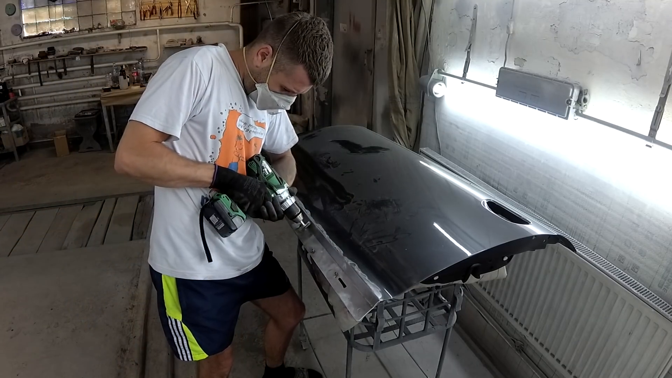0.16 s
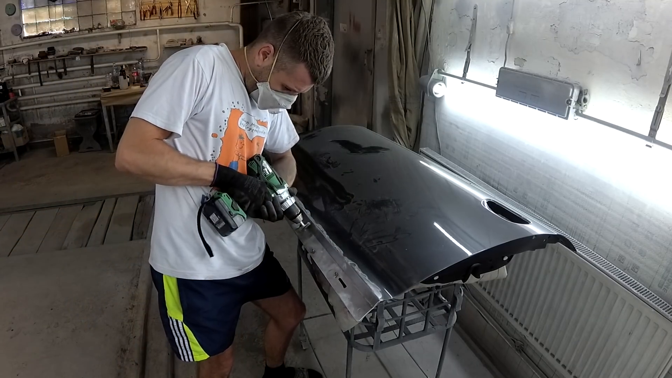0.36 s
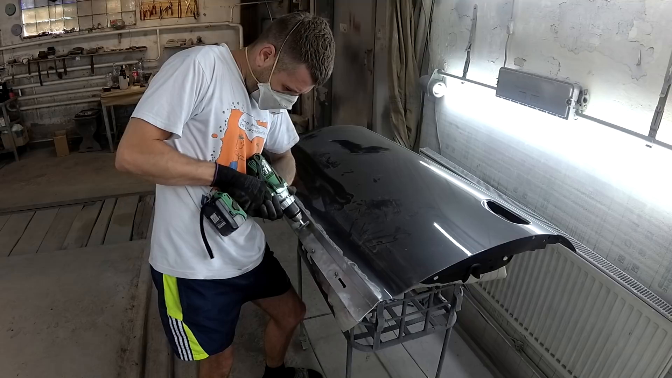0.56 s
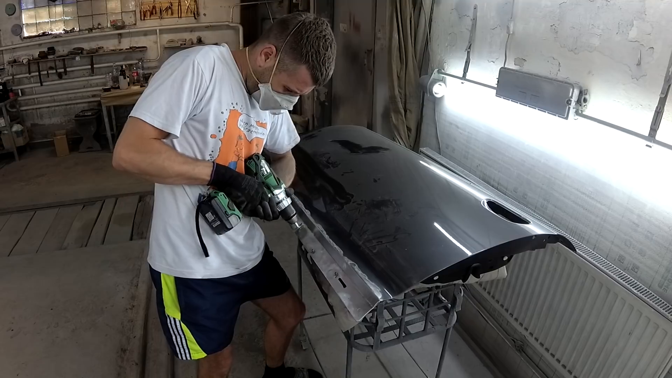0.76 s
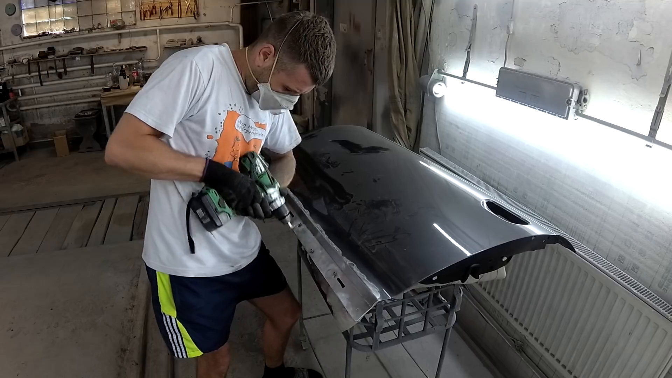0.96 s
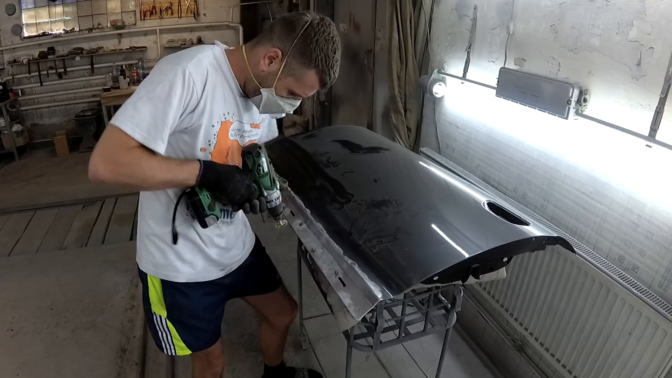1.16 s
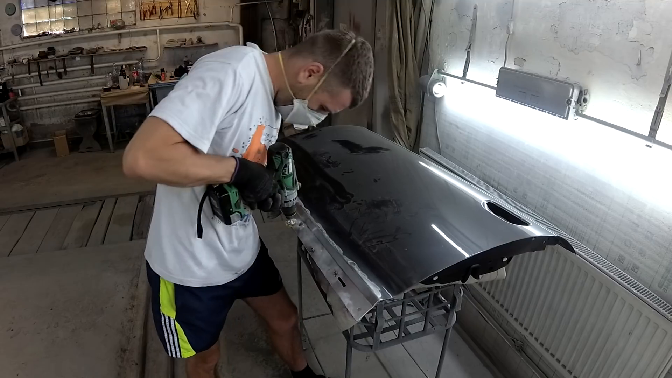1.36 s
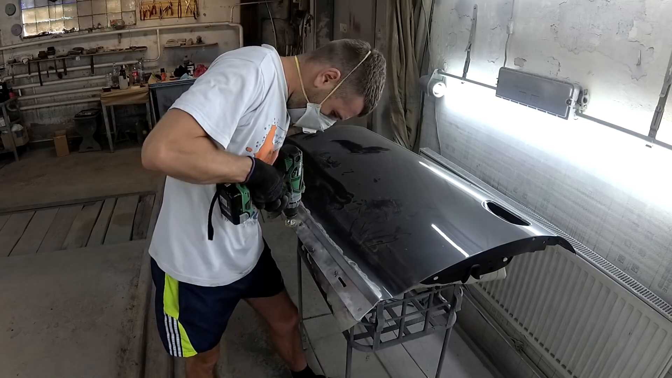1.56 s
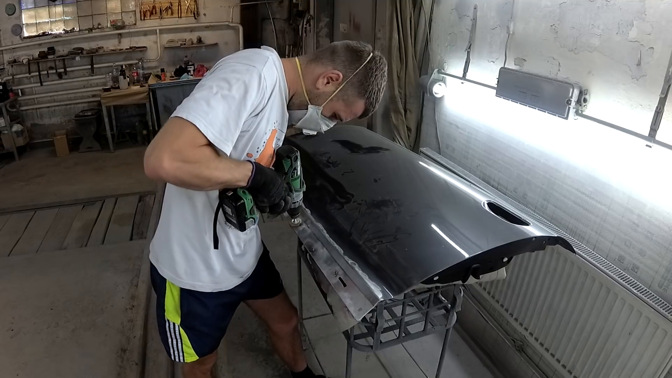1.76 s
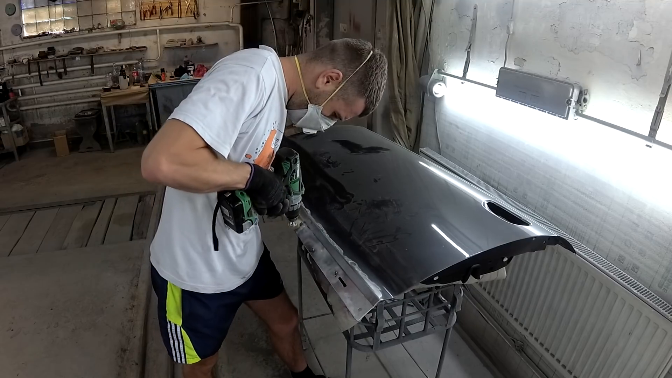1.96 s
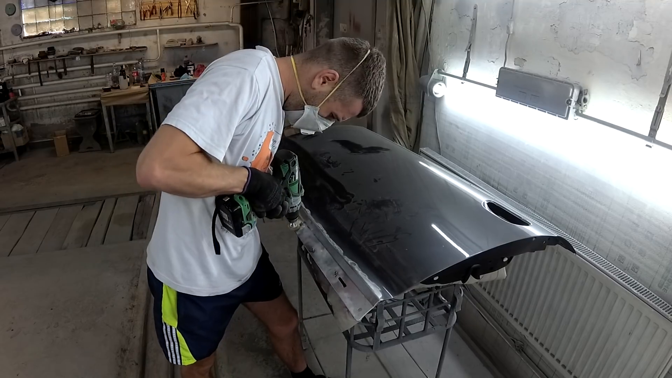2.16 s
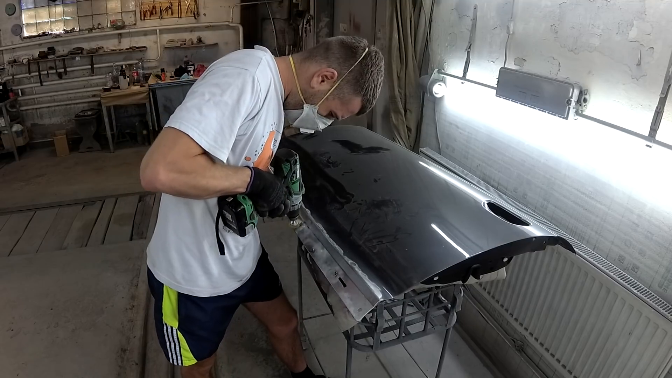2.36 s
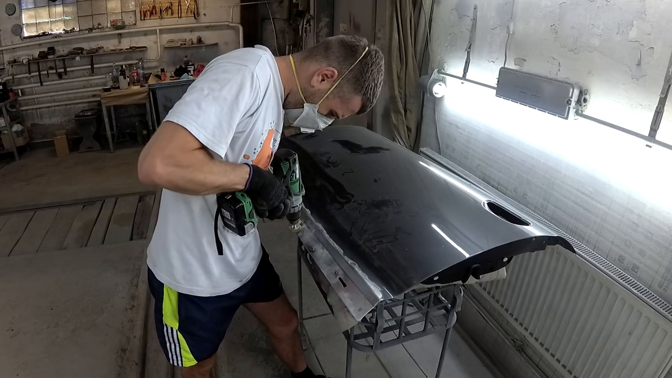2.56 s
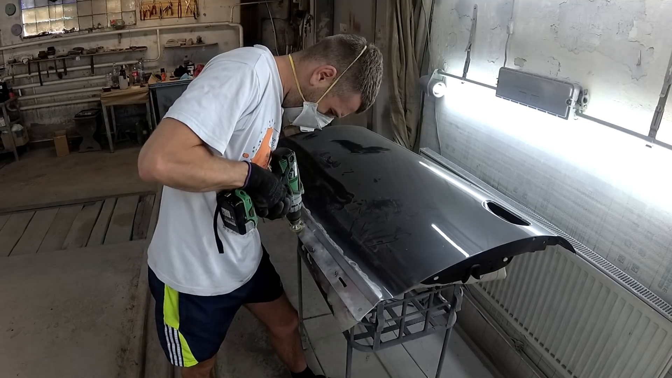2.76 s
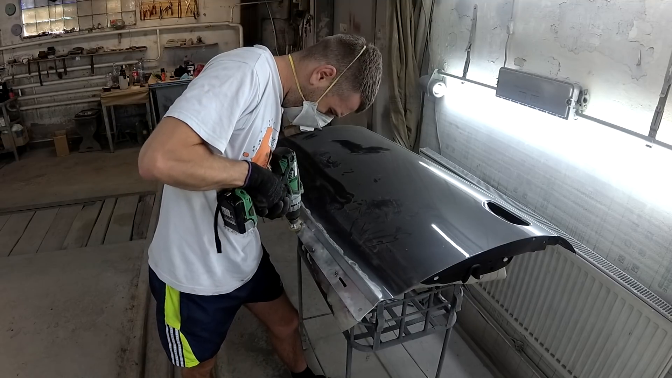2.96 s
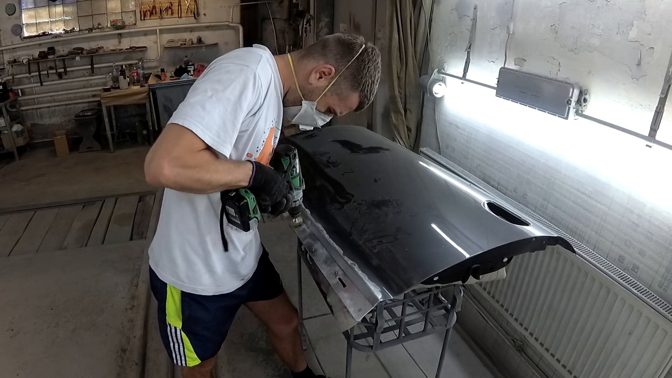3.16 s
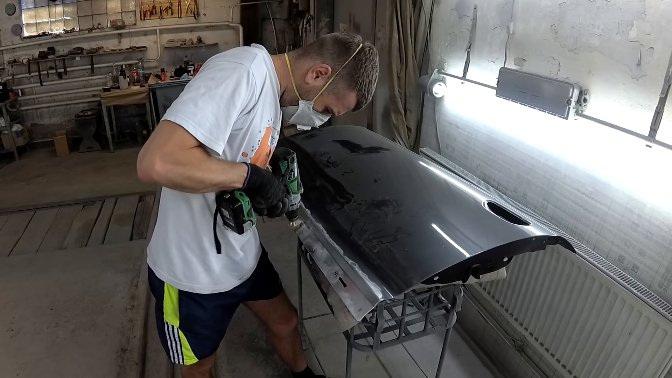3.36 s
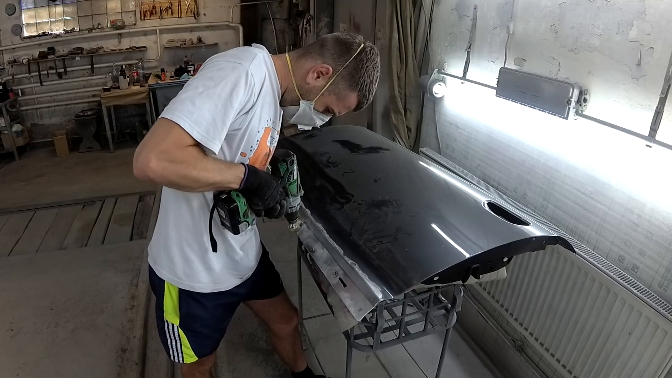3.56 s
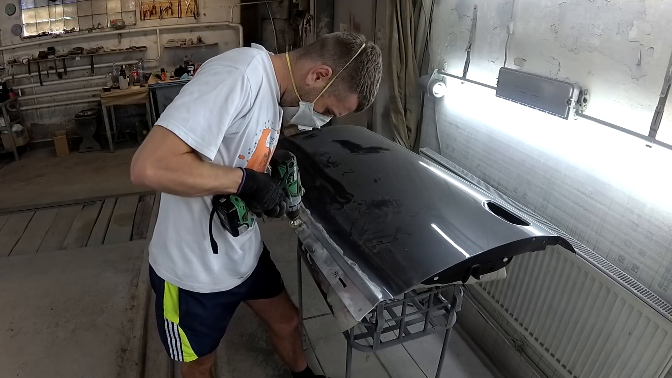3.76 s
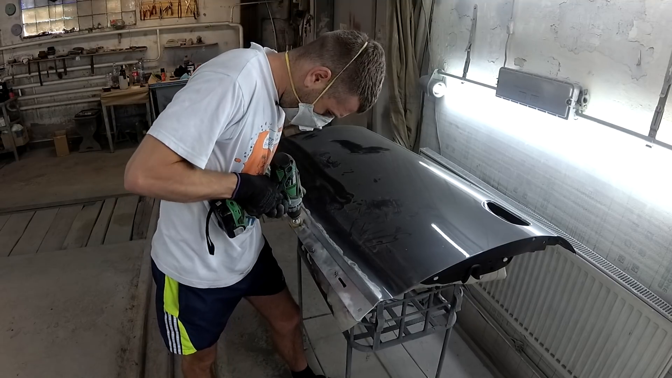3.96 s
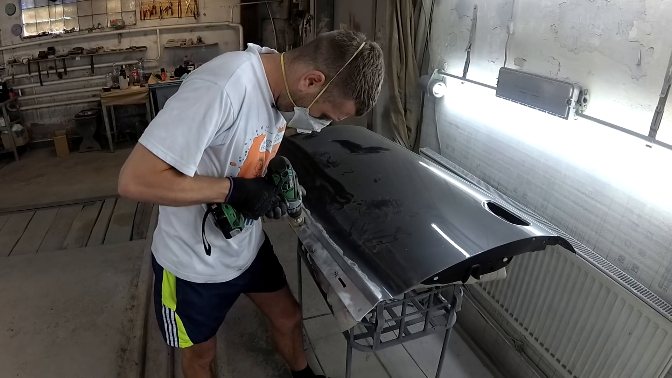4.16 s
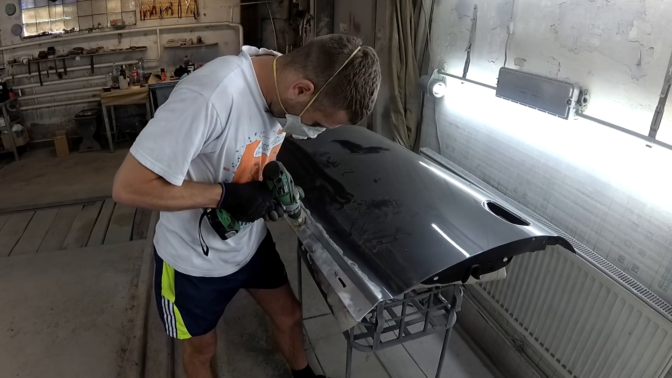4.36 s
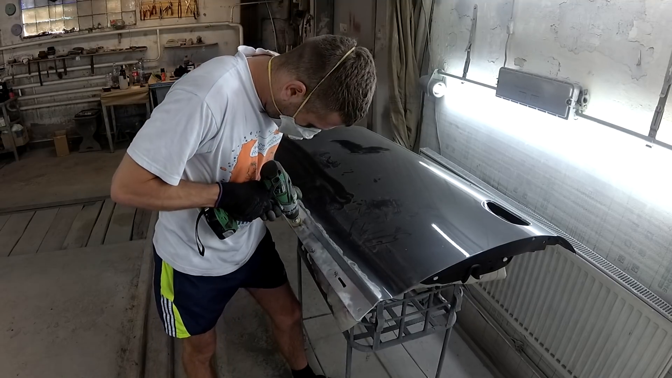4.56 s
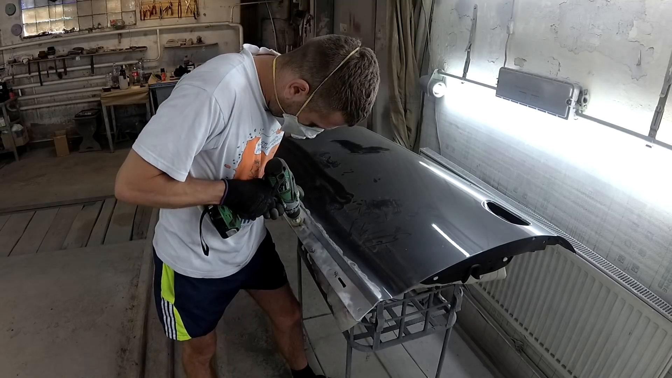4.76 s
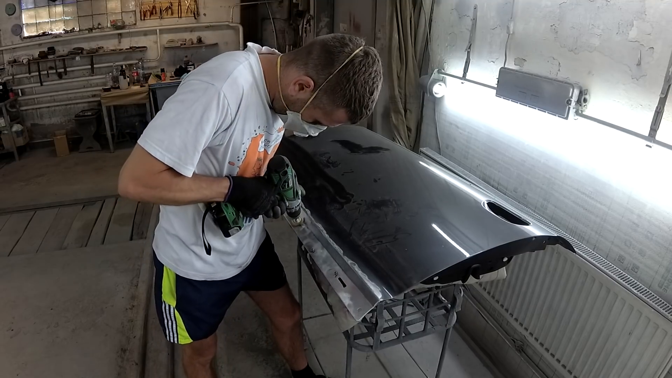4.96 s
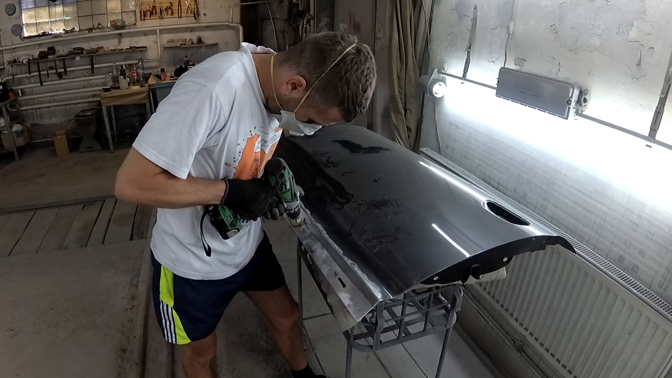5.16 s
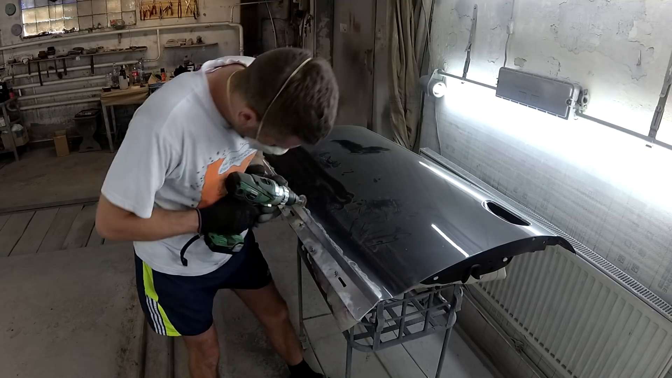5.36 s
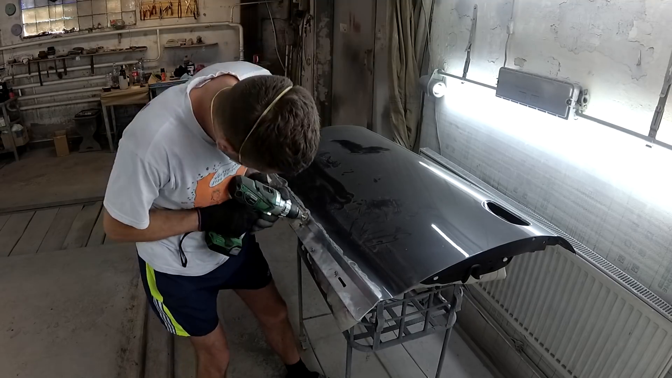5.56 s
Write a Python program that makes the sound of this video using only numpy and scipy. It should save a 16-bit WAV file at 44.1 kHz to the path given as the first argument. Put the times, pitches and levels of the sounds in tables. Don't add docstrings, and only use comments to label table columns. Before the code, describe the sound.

A small camera with stereo microphones sits close to a cordless drill, whose bright sound leans left, in a quietly humming workshop. From 0 s the motor is already whirring, with a fuzzy whine above 4 kHz, while a wire brush scrubs a metal panel. The off-centre brush bites roughly 26 times a second, giving a fast fluttering rasp and hollow, clattery sheet ringing; sharper catches occur near 0.34, 0.6 and 0.94 s. At 1.05 s the trigger clicks off and the tool brakes almost instantly. Soft ventilation, faint glove rustles, light metal ticks around 1.6 s and a barely audible far engine fill the gap. At 1.75 s the drill restarts, brushing in short irregular strokes with snags and rattles, notably near 2.85-3.24 s. Longer, heavier scrubbing runs from 3.75 to 4.55 s, then shorter strokes until about 5.3 s. The trigger clicks, a small rustle follows near 5.47 s, and only shop hum remains.

```python
import sys
import numpy as np
from scipy import signal
from scipy.fft import rfft, irfft
from scipy.io import wavfile
from scipy.ndimage import uniform_filter1d

SR = 44100
rng = np.random.default_rng(int(sys.argv[2]) if len(sys.argv) > 2 else 0)


def linear_from_db(decibels):
    return 10 ** (np.asarray(decibels, float) / 20)


def waveform_to_disk(signal):
    frames = np.transpose(np.atleast_2d(signal))
    scaled = np.clip(frames, -1, 1) * 32767
    samples = np.round(scaled).astype(np.int16)
    wavfile.write(sys.argv[1], SR, samples)


N = 248283
T = np.arange(N) / SR
HZ = np.fft.rfftfreq(N, 1 / SR)

# (frequency [Hz], density [dB per Hz])
SHOP_AIR = [(30, -21), (60, -14), (110, -18.5), (250, -8), (400, 6.5), (1500, 0.5), (2300, 2), (2800, -4.5),
            (5500, -10.5), (16000, -19)]
# (frequency [Hz], level [dB rms])
HUM = [(349.9, -73), (608.3, -77), (1055, -82), (1405, -85.5), (1755, -83.5), (2105, -81.5), (3693, -92),
       (5615, -84), (7020, -103)]
# (frequency [Hz], likeness [0..1])
SHOP_SAME = [(60, 1), (600, 0.8), (1600, 0.93), (3500, .05)]
# (frequency [Hz], level [dB])
SHOP_LEFT_DB = [(2400, -1), (4400, 4)]
# (from [s], to [s])
RUNS = [
    (0, 1.05),
    (1.75, 5.34),
]
# (time [s], rate [Hz])
MESH = [(0, 4400), (.5, 4380), (.95, 4330), (2.5, 4300), (2.9, 4320), (3.1, 4250), (3.6, 4220), (4.3, 4190),
        (4.5, 4130), (4.7, 4210), (5.63, 4215)]
# (frequency [Hz], density [dB per Hz])
WHIR = [(100, -43), (300, -6), (1000, 0.5), (2500, 1), (4300, -2.5), (6400, -7), (8500, -1), (11000, -5.5),
        (16000, -23)]
# (frequency [Hz], width [Hz], level [dB])
CASE = [(3980, 30, -43)]
# (multiple of turn rate, level re whir [dB])
ORDERS_DB = [(4, -40), (5, -38.5), (6, -35), (7, -33)]
# (first bite [s], let off [s], start pressure [dB], end pressure [dB], bite over contact [dB])
STROKES = [(0, .33, -51.5, -51, -15), (0.362, 0.698, -51.5, -53.5, 2.5), (0.715, 0.899, -55, -54, 9),
           (1.786, 1.784, -73, -69, -13), (1.869, 1.97, -56, -50.5, 3), (1.961, 2.076, -43, -57, -10),
           (2.198, 2.305, -58, -57, 8), (2.308, 2.514, -52.5, -48.5, 2.5), (2.692, 2.987, -57, -56.5, 12),
           (3.026, 3.14, -52.5, -52, 9), (3.16, 3.241, -48.5, -45, -1.5), (3.367, 3.38, -58, -54.5, 11.5),
           (3.427, 3.594, -53.5, -50, 5.5), (3.626, 3.7, -54, -56, 5.5), (3.743, 4.093, -50, -49, 1.5),
           (4.134, 4.537, -46.5, -45, 2), (4.673, 4.757, -55.5, -49.5, 4.5), (4.821, 4.893, -53, -52, -2),
           (4.942, 5.29, -53, -53, 2.5)]
# (time [s], rasp [dB], push into panel re rasp [dB], length [ms])
CATCHES = [(.07, -40.5, -2, 8.6), (.338, -39.5, 1, 6.5), (.483, -44, 0, 6.2), (.6, -41, -5.5, 7),
           (.937, -38.5, -2, 6.6), (1.547, -67, -10, 5.6), (1.575, -69, -4, 11), (1.607, -61.5, 7, 7.9),
           (1.785, -46, -16, 9.4), (1.846, -42.5, -7, 4.6), (1.941, -41, -4, 3.8), (2.104, -46, 2, 8.5),
           (2.256, -45, 0, 5.2), (2.494, -49, -1, 2.8), (2.578, -58, 7, 5), (2.661, -46, -7, 6.7),
           (2.691, -46.5, 6.5, 4.4), (2.842, -39, 4, 3.3), (2.994, -36.5, -6, 6), (3.141, -43, 4.5, 7.3),
           (3.237, -37, 2, 7.1), (3.972, -35.5, -18, 6), (4.403, -39, -1, 9), (4.53, -43, 5, 6),
           (4.601, -38, -0.5, 6), (4.757, -46, 2, 9), (4.916, -38, 1.5, 7), (4.978, -53, 8, 3.3),
           (5.115, -50, 4.5, 5), (5.269, -45, 1, 6.9)]
# (frequency [Hz], density [dB per Hz])
RASP = [(2000, -31.5), (5000, -30), (8000, -9), (11400, -4.5), (12100, 2), (14100, 3.5), (15800, 1.5),
        (17000, -13)]
# (frequency [Hz], width [Hz], level [dB])
PANEL = [(355, 12, -12), (409, 20, -3), (500, 17, -6), (624, 12, -14), (656, 36, -12), (872, 12, -6),
         (904, 17, -6), (990, 15, -12), (1108, 42, -1.5), (1281, 13, -11), (1424, 30, -5), (1641, 16, -12),
         (1690, 25, -9), (1792, 19, -12), (1959, 39, -12), (2234, 28, -13), (2293, 18, -15),
         (2460, 16, -17)]
# (frequency [Hz], level [dB])
SHEET = [(150, -58.5), (280, -20.5), (340, -31.5), (390, -6), (500, -7.5), (570, -14), (850, -15.5),
         (950, -31), (1150, -10), (1300, -19.5), (1440, -10.5), (1550, -18.5), (2500, -23), (3200, -36.5)]
# (time [s], give of the sheet [dB], stiffness favouring higher modes [dB])
SPOT = [(0, -2.5, 0.5), (.35, -3, -2), (.65, -4, -15), (.8, 3, 3.5), (1.05, 0, -0.5), (1.6, 2, -1),
        (1.78, 3, 2.5), (1.9, -4, 8), (2.22, 0.5, 4.5), (2.55, -6.5, 7.5), (2.7, 0.5, 4), (3.1, -1.5, 6),
        (3.3, -6.5, 5), (3.7, -4, 1), (3.95, -2, 6.5), (4.2, -3.5, -1), (4.5, -2, 4), (5., -6, -1.5)]
# (from [s], to [s], start level [dB], end level [dB], rattle re level [dB])
SHUDDERS = [
    (0.949, 1.007, -43.5, -38.5, -0.5),
    (1.56, 1.606, -74, -77, -1),
    (1.725, 1.77, -63, -56.5, -5),
    (5.3, 5.322, -67.5, -59, 11),
]
# (frequency [Hz], likeness [0..1])
TOOL_SAME = [(60, .6), (130, .9), (400, .99), (1200, .95), (2000, .8), (3000, .47), (3900, .15), (7000, .1),
             (11000, .2), (12200, .35), (13600, .2), (15200, .55)]
# (frequency [Hz], level [dB])
TOOL_LEFT_DB = [(60, 13), (110, 1), (200, -6.5), (380, -0.5), (700, -2), (1290, -1), (2380, -1), (4400, 9),
                (8120, 8), (15000, 15)]
# (frequency [Hz], lead of left port [rad])
LAG = [(0, 0), (1300, -.5), (2000, -1.), (3300, -.7), (4500, 1.3), (6500, .2), (10000, .2), (11500, 1.2),
       (13000, 0), (15000, -2.7)]
# (time [s], level [dB])
JOLTS = [(.79, -80), (0.871, -78), (1.97, -77), (2.692, -78), (2.847, -70), (2.994, -78), (3.237, -74),
         (4.46, -75), (4.52, -76)]
# (time [s], level [dB], fade [dB/s])
HANDLING = [
    (1.048, -46, 298),
    (1.28, -73.5, 250),
    (1.36, -69.5, 150),
    (1.62, -75, 150),
    (5.315, -51, 250),
    (5.469, -62.5, 152),
]
# (frequency [Hz], density [dB per Hz])
RUSTLE = [(1500, -19), (3000, 2), (8000, -1.5), (12000, -4.5), (16000, -12)]

SHOP_DB, MIC_HISS_DB = -73.5, -80
TEETH = 165
IDLE_DB = (-54, -61)
STRAIN_DB, STRAIN_SLOPE = -54, 0.57
SPIN_UP_DB_PER_S, BRAKE_DB_PER_S = 452, 396
PRESS_DB_PER_S, LIFT_DB_PER_S, SETTLE_DB_PER_S = 255, 103, 208
BITE_MS, BITE_SPREAD_DB, BITE_DUTY, SLIP_MS = 6.6, 1.1, 0.2, 2.2
PUSH_DB, PUSH_SPREAD_DB = -5, 2.5
UPPER_SHARE, UPPER_DB = 0.78, -6
CHATTER_DB, CHATTER_MS = 2, 18
LEAD_S = 7 / SR
EDGE_HZ = 15800


def evened(x):
    return x / np.sqrt(np.mean(x ** 2) + 1e-20)


def slow_noise(shape, span):
    noise = uniform_filter1d(rng.standard_normal(shape), span)
    return evened(uniform_filter1d(noise, span))


def read(points, hz):
    f, value = np.transpose(points)
    return np.interp(np.log(hz + 1), np.log(f + 1), value)


def curve(rows, column):
    rows = np.asarray(rows)
    return np.interp(T, rows[:, 0], rows[:, column])


def held(start, end, start_db, end_db, rise, fall):
    slide = np.interp(T, [start, end], [start_db, end_db])
    return slide - rise * np.maximum(start - T, 0) - fall * np.maximum(T - end, 0)


def colour(x, points):
    return irfft(rfft(x) * linear_from_db(read(points, HZ)), N)


def band_rms(x, lo_hz, hi_hz):
    power = abs(rfft(x)) ** 2
    inside = (HZ > lo_hz) & (HZ < hi_hz)
    return np.sqrt(power[..., inside].sum(-1).mean() * 2) / N


def ports(pair, same, left_db):
    a, b = rfft(pair)
    c = np.clip(read(same, HZ), -1, 1)
    tilt = linear_from_db(read(left_db, HZ) / 2)
    delay = np.exp(-1j * (read(LAG, HZ) + 2 * np.pi * HZ * LEAD_S))
    right = (c * a + np.sqrt(1 - c ** 2) * b) * delay
    gain = 2 / np.sqrt(tilt ** 2 + tilt ** -2 + 2 * abs(c))
    return irfft(np.array([a * tilt, right / tilt]) * gain, N)


def shop():
    air = colour(rng.standard_normal((2, N)), SHOP_AIR)
    air *= linear_from_db(SHOP_DB) / band_rms(air, 700, 16000)
    waver = evened(uniform_filter1d(rng.standard_normal((len(HUM), N // 500 + 2)), 5))
    hum = np.zeros(N)
    for (hz, db), w in zip(HUM, waver):
        level_db = db + 0.5 + 0.78 * np.interp(T, np.arange(len(w)) * 500 / SR, w)
        hum += linear_from_db(level_db) * np.sin(2 * np.pi * (hz * T + rng.random()))
    return ports(air, SHOP_SAME, SHOP_LEFT_DB) + hum


def chuck_turns():
    return np.cumsum(curve(MESH, column=1)) / TEETH / SR


def spinning():
    return np.array([held(on, off, 0, 0, SPIN_UP_DB_PER_S, BRAKE_DB_PER_S) for on, off in RUNS])


def pressure():
    contact = np.array([held(*row[:4], PRESS_DB_PER_S, LIFT_DB_PER_S) for row in STROKES])
    contact = contact + spinning().max(0)
    extra = 10 * np.log10(1 + BITE_DUTY * linear_from_db(2 * np.array(STROKES)[:, 4:]))
    return contact.max(0), (contact + extra).max(0)


def load(effort_db):
    idle = spinning() + np.array(IDLE_DB)[:, None]
    strain = STRAIN_DB + STRAIN_SLOPE * (effort_db + 52)
    return 10 * np.log10(sum(linear_from_db(2 * db) for db in [*idle, strain]))


def drill(effort_db):
    z = rfft(rng.standard_normal((2, N)))
    case = sum(linear_from_db(db) * np.sqrt(7000 / width) / (1 + 2j * (HZ - hz) / width) ** 2
               for hz, width, db in CASE)
    hiss = irfft(z * (linear_from_db(read(WHIR, HZ)) + case), N)
    hiss /= band_rms(hiss, 3000, 10500)
    turns = chuck_turns()
    fuzz = slow_noise((2, 2, N), 450)
    whine = ((2.6 + fuzz[0] + 1j * fuzz[1]) * np.exp(2j * np.pi * TEETH * turns)).real
    whine *= linear_from_db(np.interp(T, [.9, 1.9, 2.5, 3.5], [-16.5, -27, -24, -18.5]))
    shake = sum(linear_from_db(db + fuzz[0]) * np.sin(2 * np.pi * (k * turns + rng.random())) for k, db in ORDERS_DB)
    running = sum((T > on) & (T < off) for on, off in RUNS)
    gate = uniform_filter1d(running * 1., 1500)
    flutter = linear_from_db(0.77 * np.sin(4 * np.pi * turns))
    return (hiss * flutter + gate * (whine + shake)) * linear_from_db(load(effort_db) - 2.0)


def bristles(per_s, spread_db):
    size = linear_from_db(spread_db * np.minimum(rng.exponential(1, (2, N)), 5))
    size = size * rng.choice([-1., 1.], (2, N))
    return evened(size * (rng.random((2, N)) < per_s / SR))


def bite_rows():
    turns = chuck_turns()
    rows, count = [], np.arange(16)
    spreads = rng.standard_normal((len(STROKES), 3, 16))
    for (start, end, start_db, end_db, wobble_db), (slip, size, push) in zip(STROKES, spreads):
        s = np.interp(np.interp(start, T, turns) + count, turns, T)
        db = np.interp(s, [start, end], [start_db, end_db]) + wobble_db + BITE_SPREAD_DB * size + 5.5
        at_s = abs(s + slip * (count > 0) * SLIP_MS / 1000)
        row = [at_s, db, PUSH_DB + PUSH_SPREAD_DB * push, BITE_MS * linear_from_db(-size)]
        rows.append(np.transpose(row)[s <= end + .005])
    return np.vstack(rows + [CATCHES])


def bites(rows, levels_db, rise, fall):
    power, t = np.zeros(N + 3600), np.arange(-1200, 2400) / SR
    for (s, _, _, ms), db in zip(rows, levels_db):
        at = round(s * SR)
        width_s = np.where(t < 0, rise, fall) * ms / 1000
        power[at:at + 3600] += linear_from_db(2 * db) * np.exp(-(t / width_s) ** 2)
    return power[1200:1200 + N]


def rasp(rows, contact_db):
    scratch = colour(bristles(per_s=11000, spread_db=2.5), RASP)
    scratch /= band_rms(scratch, 11500, 15800)
    power = linear_from_db(2 * contact_db) + bites(rows, rows[:, 1] - 5.5, 0.63, 1.02)
    return scratch * np.sqrt(power)


def sheet_ring():
    hz = np.fft.rfftfreq(16384, 1 / SR)
    power = linear_from_db(2 * read(SHEET, hz))
    power = power + sum(linear_from_db(2 * db) / (1 + (2 * (hz - f) / width) ** 2) ** 2 for f, width, db in PANEL)
    log_gain = np.log(np.r_[power, power[-2:0:-1]]) / 2
    return np.fft.ifft(np.exp(np.conj(signal.hilbert(log_gain)))).real[None, :8000]


def panel(rows, effort_db):
    ring = sheet_ring()
    strokes = bristles(per_s=5000, spread_db=2.5)
    steady = signal.oaconvolve(strokes, ring, axes=1)[:, :N]
    push = bites(rows, rows[:, 1] + rows[:, 2] - 3., .9, 1.4)
    stiff_db = curve(SPOT, column=2)
    chatter = slow_noise(N, round(CHATTER_MS * SR / 1000))
    brush = linear_from_db(effort_db + curve(SPOT, column=1)) * linear_from_db(CHATTER_DB * chatter)
    shaken = [linear_from_db(held(*row[:4], PRESS_DB_PER_S, SETTLE_DB_PER_S)) for row in SHUDDERS]
    rub = np.sqrt(brush ** 2 + sum(shaken) ** 2)
    rattle = brush * linear_from_db(UPPER_SHARE * stiff_db + UPPER_DB)
    rattle = rattle + sum(v * linear_from_db(row[4]) for v, row in zip(shaken, SHUDDERS))
    low = np.sqrt(0.59 * rub ** 2 + 0.11 * push) / band_rms(steady, 330, 870)
    middle = np.sqrt((0.74 * rub * linear_from_db(stiff_db)) ** 2 + push) / band_rms(steady, 640, 1720)
    high = np.sqrt((0.83 * rattle) ** 2 + 0.15 * push) / band_rms(steady, 1480, 2900)
    drive = colour(strokes * low, [(740, 0), (760, -40)])
    drive += colour(strokes * middle, [(740, -40), (760, 0), (1540, 0), (1560, -40)])
    drive += colour(strokes * high, [(1540, -40), (1560, 0)])
    return signal.oaconvolve(drive, ring, axes=1)[:, :N]


def walls(x):
    taps = np.zeros((2, 16000))
    at = np.arange(300, 15980, 20) + rng.integers(0, 20, (2, 784))
    np.put_along_axis(taps, at, rng.choice([-1., 1.], at.shape), 1)
    hz, t, z = signal.stft(taps, SR, nperseg=256)
    decay_s = read([(300, 0.042), (3000, 0.54), (15000, 0.27)], hz)[:, None]
    tail = signal.istft(z * linear_from_db(-60 * t / decay_s), SR, nperseg=256)[1]
    return signal.oaconvolve(x, tail / np.linalg.norm(tail[0]), axes=1)[:, :N]


def jolts():
    train, t = np.zeros((2, N)), T[:3000]
    s, db = np.transpose(JOLTS)
    train[:, np.round(s * SR).astype(int)] = linear_from_db(db + 25.0) * linear_from_db([[3.5], [-3.5]])
    pulse = t / 0.0016 * (1 - t / 0.0061) * np.exp(-t / 0.00096)
    return signal.oaconvolve(train, pulse[None], axes=1)[:, :N]


def handling():
    rustle = evened(colour(bristles(per_s=13000, spread_db=1.5), RUSTLE))
    return rustle * sum(linear_from_db(held(s, s, db, db, 1200, fade)) for s, db, fade in HANDLING)


def traffic():
    hz = np.interp(T, [1.2, 1.85, 2.4], [104, 122, 135])
    level = linear_from_db(np.interp(T, [1.1, 1.4, 1.8, 2.3, 2.6], [-110, -94, -87.5, -88, -110]))
    engine = level * np.sin(2 * np.pi * np.cumsum(hz) / SR)
    return engine + linear_from_db(-101.5) * np.sin(2 * np.pi * 60 * T)


def scene():
    rows = bite_rows()
    contact_db, effort_db = pressure()
    tool = rasp(rows, contact_db) + panel(rows, effort_db) + drill(effort_db) + handling()
    hiss = linear_from_db(MIC_HISS_DB) * np.diff(rng.standard_normal((2, N + 2)), 2) / 4
    heard = ports(tool + linear_from_db(-12.5) * walls(tool), TOOL_SAME, TOOL_LEFT_DB)
    return heard + jolts() + shop() + traffic() + hiss


def low_pass(x):
    return signal.sosfilt(signal.butter(12, 16890, fs=SR, output="sos"), x)


def record(dry):
    edge = signal.firwin(511, EDGE_HZ, window=("kaiser", 9), fs=SR)
    mix = signal.oaconvolve(dry, edge[None], "same")
    return low_pass(mix)


dry = scene()
out = record(dry)
waveform_to_disk(out)
```